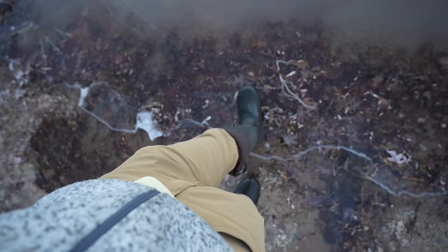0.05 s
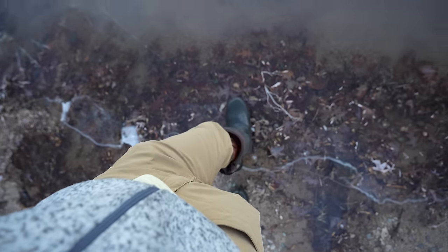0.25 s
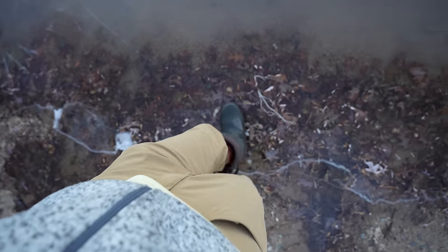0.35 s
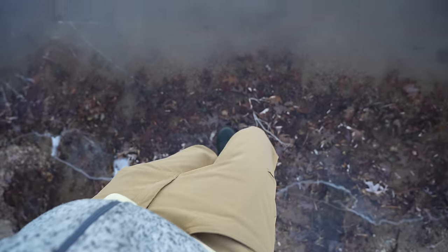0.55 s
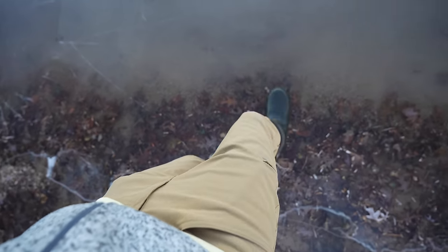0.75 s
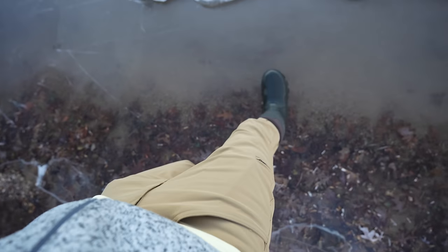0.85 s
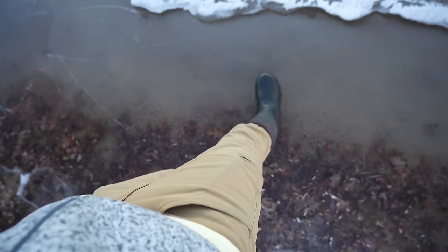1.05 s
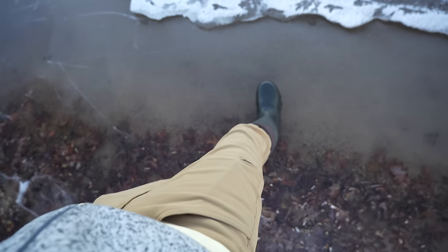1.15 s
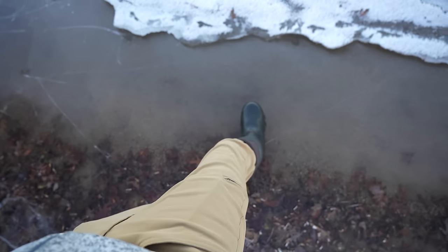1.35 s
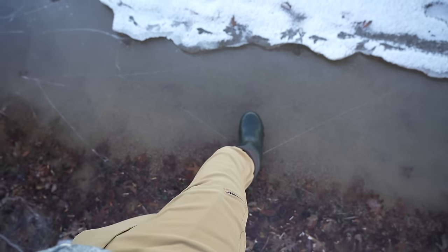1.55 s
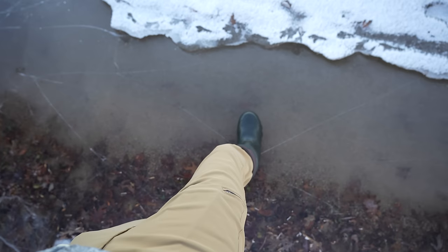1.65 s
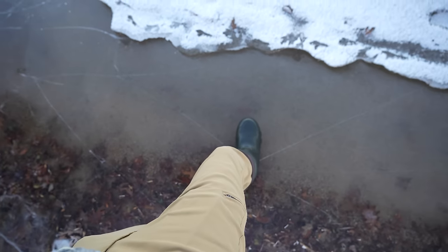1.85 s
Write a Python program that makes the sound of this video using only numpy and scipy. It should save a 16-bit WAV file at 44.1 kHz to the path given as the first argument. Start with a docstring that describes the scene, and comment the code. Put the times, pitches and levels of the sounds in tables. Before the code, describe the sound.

Thin ice crackles under a boot, close by in quiet outdoor air. A short, dull knock comes at about 0.2 seconds, followed by irregular small cracks and a fine, bright fizz with a slightly hollow ring. From 1.2 seconds the cracks crowd together and grow louder over faint low thuds. The sheet breaks with one sharp snap at 1.6 seconds, and lighter crackles fade by 1.9.

```python
"""Thin ice cracks under a rubber boot stepping out from a frozen, leafy shore.
Outdoors, with the microphone at chest height above the ice. Each crack is a spray of splinters,
a short snap and a hollow ring of the sheet, over fine crackle, dull knocks and low thuds.
Under the full weight the cracks crowd together and the sheet breaks once, sharply."""
import sys
import numpy as np
from scipy import signal
from scipy.fft import rfft, irfft, next_fast_len
from scipy.io import wavfile
from scipy.ndimage import map_coordinates

SR = 44100
rng = np.random.default_rng(int(sys.argv[2]) if len(sys.argv) > 2 else 0)


def generate_wav(sig):
    """Save sig (samples, or channels by samples) to the path in sys.argv[1] as 16-bit PCM at SR."""
    pcm = np.round(np.clip(np.atleast_2d(sig).T, -1, 1) * 32767).astype(np.int16)
    wavfile.write(sys.argv[1], SR, pcm)


N = 83790
TIME = np.arange(N) / SR
T = np.arange(4096) / SR  # time within one short sound [s]
FREQS = np.fft.rfftfreq(len(T), 1 / SR) + 1  # [Hz], offset to keep logarithms finite


def amp(db):
    return 10 ** (np.asarray(db) / 20)


def unit(x):
    return x / np.sqrt(np.mean(x ** 2) + 1e-20)


def burst(x, db, window_s=0.005):
    """Give a short sound the energy of level db held for window_s."""
    return amp(db) * x * np.sqrt(window_s * SR / (np.sum(x ** 2) + 1e-20))


def add(out, s, x):
    """Mix x in at time s."""
    i = int(round(s * SR))
    out[i:i + len(x)] += x[:N - i]


def causal(gain):
    """Minimum-phase impulse response of a gain curve."""
    cepstrum = irfft(np.log(np.maximum(gain, 1e-5)))
    cepstrum[1:len(cepstrum) // 2] *= 2
    cepstrum[len(cepstrum) // 2 + 1:] = 0
    return irfft(np.exp(rfft(cepstrum)))


def colour(points):
    """Impulse response of a (frequency [Hz], level [dB]) spectrum."""
    hz, db = np.transpose(points)
    return causal(amp(np.interp(np.log(FREQS), np.log(hz), db)))


def through(x, response):
    return signal.fftconvolve(x, response)[:len(x)]


def radiate(x, low_hz):
    """Little bass reaches the microphone below low_hz."""
    return signal.sosfilt(signal.butter(3, low_hz, "high", fs=SR, output="sos"), x)


# Open air at the shore (frequency [Hz], relative level [dB])
AIR_SPECTRUM = [(25, -38), (60, -5.5), (130, -0.5), (200, 1), (320, -10), (1000, -15), (3000, -27.5),
                (8000, -26.5), (15800, -31)]
def air():
    """A faint, steady rumble of outdoor air at the microphone."""
    return amp(-58) * unit(through(rng.standard_normal(N), colour(AIR_SPECTRUM)))


# Treble and body of the crackle (frequency [Hz], relative level [dB])
FIZZ_SPECTRUM = [(1500, -22.5), (2700, -5.5), (3800, -7.5), (5000, -2.5), (7000, 2), (9500, 2),
                 (12500, -0.5), (15800, -4.5)]
MURMUR_SPECTRUM = [(150, -19), (300, -4), (430, -4.5), (535, 0.5), (680, 0.5), (1000, -1), (2000, -4.5),
                   (3000, -10), (5000, -26)]
# Course of the crackle underfoot (time [s], relative treble level [dB], relative body level [dB])
CRACKLE_LEVELS = [(0, -71, -70), (.11, -73, -71), (.14, -59, -52), (.258, -55, -86), (.28, -46.5, -54),
                  (.34, -42.5, -42.5), (.395, -51.5, -56.5), (.44, -45.5, -47.5), (.52, -45.5, -49.5),
                  (.58, -51.5, -51.5), (.68, -49.5, -48), (.75, -48.5, -48.5), (.79, -47, -51.5),
                  (.815, -44.5, -49), (.88, -47.5, -52.5), (.978, -44, -46.5), (1.1, -40.5, -49.5),
                  (1.234, -46.5, -53.5), (1.275, -27, -35.5), (1.348, -33, -41.5), (1.412, -34, -41),
                  (1.476, -31, -37), (1.54, -32.5, -42), (1.608, -36.5, -46.5), (1.75, -44.5, -49.5),
                  (1.81, -54, -62.5), (1.9, -57, -54.5)]
def crackle(fractures_per_s=900, spread_db=5, even_rustle=0.081):
    """Countless tiny fractures fizz and keep the sheet murmuring."""
    times, treble_db, body_db = np.transpose(CRACKLE_LEVELS)
    fractures = rng.random(N) < fractures_per_s / SR
    sizes = fractures * amp(spread_db * np.minimum(rng.exponential(size=N), 3.5))
    power = np.abs(through(sizes ** 2, np.exp(-T / 0.00049)))
    grains = np.sqrt(power / power.mean() + even_rustle)
    fizz = unit(through(grains * rng.standard_normal(N), colour(FIZZ_SPECTRUM)))
    murmur = unit(through(grains * rng.standard_normal(N), colour(MURMUR_SPECTRUM)))
    fizz *= amp(np.interp(TIME, times, treble_db) - 1)
    murmur *= amp(np.interp(TIME, times, body_db) - 1.5)
    return fizz + murmur


def ruptures(spiky):
    """A dense run of tiny breaks of uneven size."""
    return rng.standard_normal(len(T)) * np.exp(spiky * np.clip(rng.standard_normal(len(T)), -2, 2))


def chips(mean_delay_s=0.0062, die_s=0.00066):
    """Envelope of three loose chips breaking off after a crack."""
    age = T - mean_delay_s * rng.gamma(2, 0.5, size=(3, 1))
    sizes = rng.random(size=(3, 1))
    return np.sum(sizes * (age > 0) * np.exp(-np.abs(age) / die_s), axis=0)


# Splintering ice (frequency [Hz], relative level [dB])
SPLINTER_SPECTRUM = [(1500, -17), (3000, -21.5), (3800, -12), (4800, -4), (7000, 3), (9500, 1.5),
                     (12500, -0.5), (15800, -6.5)]
def splinters(centre_hz, debris, usual_hz=9240, die_s=0.0013):
    """A bright spray of tiny breaks, its treble tilted towards centre_hz."""
    db_per_octave = 23.5 * np.log2(centre_hz / usual_hz)
    tilt_db = db_per_octave * np.log2(np.maximum(FREQS, 4000) / usual_hz)
    gain = np.abs(rfft(colour(SPLINTER_SPECTRUM))) * amp(tilt_db)
    return through(ruptures(spiky=0.61) * (np.exp(-T / die_s) + debris), causal(gain))


def snap(hz, debris, width_octaves=0.69, die_s=0.0019):
    """The short midrange burst of the ice giving way."""
    band = 1 / (1 + (np.log2(FREQS / hz) / width_octaves) ** 2) ** 1.24
    envelope = np.exp(-T / die_s) + amp(-4.5) * debris
    return through(ruptures(spiky=0.61) * envelope, causal(band))


# Upper modes of the sheet (frequency [Hz], relative level [dB], time to fall 60 dB [s])
SHEET_MODES = [(676.6, -4, 0.031), (771, -3.5, 0.02), (912, -2, 0.017), (1124, -1.5, 0.011)]
def flex(glide=0.3, glide_s=0.0034, rise_s=0.00091):
    """High bending waves arrive first, so the sheet rings in a falling chirp, different each time."""
    swept = T + glide * glide_s * (1 - np.exp(-T / glide_s))
    ring = np.zeros(len(T))
    for hz, db, t60 in SHEET_MODES:
        envelope = amp(db + rng.normal(0, 3.5) - 60 * T / t60)
        pitch = hz * (1 + rng.normal(0, 0.039))
        ring += envelope * np.sin(2 * np.pi * (pitch * swept + rng.random()))
    return ring * (1 - np.exp(-T / rise_s))


# Cracks underfoot (time [s], splinter level [dB], nominal splinter centre [Hz], snap level [dB],
# snap pitch [Hz], flex level [dB], hollow note level [dB])
ICE_CRACKS = [(0.143, -40, 12100.0, -38.5, 1530.0, -45.5, -45),
              (0.1525, -52.0, 9700.0, -42, 1540.0, -43.5, -63), (0.19, -41, 9900, -44.5, 1990.0, -54, -54),
              (0.2754, -34, 11300.0, -46.0, 1830.0, -50, -60.0), (0.2821, -31, 9900, -40, 2030.0, -45, -55),
              (0.292, -30.5, 11200, -43.0, 1600.0, -43, -57), (0.299, -37, 9900.0, -49.0, 1680.0, -48, -59),
              (0.3091, -36, 9600, -38, 1410, -40, -50), (0.3225, -35, 8400.0, -34.0, 1450.0, -39, -49),
              (0.3286, -33.5, 8800.0, -45.0, 2110.0, -48, -51), (0.337, -29.0, 9800, -35.5, 1520, -44, -38),
              (0.3704, -34.5, 10500.0, -47.0, 1730.0, -44.5, -50.0),
              (0.4154, -33.5, 11300.0, -49, 1530.0, -44, -56),
              (0.422, -34.0, 11400.0, -44, 1540.0, -42, -43),
              (0.4331, -30.0, 10600.0, -28.5, 1300.0, -35.5, -35),
              (0.4424, -32.5, 10800.0, -43.0, 1900.0, -46.0, -41.0),
              (0.479, -29.5, 8600, -34.0, 1700.0, -40, -44), (0.496, -27.5, 10000, -27, 1530, -28.5, -33),
              (0.5363, -39.5, 10200, -60, 2290.0, -56, -58),
              (0.6143, -36.5, 10900.0, -51.0, 1630.0, -47, -49),
              (0.6359, -34, 8600, -60, 1610.0, -40.5, -57), (0.641, -30.5, 10300.0, -28, 1240, -34, -51),
              (0.6627, -37.5, 11200.0, -50, 1370.0, -47, -46),
              (0.701, -37, 10900.0, -47.0, 1500.0, -39.5, -44),
              (0.7257, -35.0, 8900, -31.0, 1670, -34.5, -35.5),
              (0.7391, -28.0, 8900, -36, 1270, -32.5, -40.0),
              (0.7701, -37.5, 9600.0, -43.0, 2240.0, -55, -47.5),
              (0.8989, -31.5, 11500, -57, 2170.0, -44.0, -50), (0.9106, -32, 7760, -33.0, 1880, -36, -39),
              (0.9159, -36, 8800.0, -31.5, 1610, -35, -41), (0.9276, -34, 8300.0, -33.0, 1760, -39, -39),
              (0.9415, -33, 10700.0, -56, 2150.0, -51, -37), (0.972, -38, 8600.0, -45, 1720, -40.5, -40),
              (1.001, -36, 9600.0, -46, 1990.0, -52, -49), (1.0145, -30.0, 8500, -36.5, 1860.0, -38, -36),
              (1.0318, -43, 9900.0, -45, 1630.0, -35, -49), (1.0516, -31, 8200, -39.5, 1600, -37.5, -39.5),
              (1.0923, -28.5, 9100, -33, 1420, -36, -39), (1.113, -39.0, 9300.0, -37.5, 1660, -39.5, -42.5),
              (1.1302, -37.0, 8100.0, -35.5, 2080, -55, -52), (1.1743, -25, 7250, -25.5, 2130, -61, -47),
              (1.1775, -35, 7900, -39, 2230, -37, -47), (1.184, -22.5, 8300, -32, 1830.0, -34.5, -27.5),
              (1.218, -32.0, 7300, -47.0, 1870.0, -45, -55), (1.2494, -32.0, 8100, -36.5, 2630, -45, -50),
              (1.259, -26, 7850, -21.5, 1630, -35, -28), (1.2654, -25.5, 8800, -32.5, 1910, -30.5, -22),
              (1.2907, -17, 8250, -24.5, 1700.0, -46, -28.5),
              (1.3012, -21.5, 8500.0, -24.5, 1490, -32.5, -28.5),
              (1.3228, -22.5, 9200, -26, 2540, -52, -48), (1.3266, -22, 8800.0, -28, 2090, -39, -34),
              (1.3343, -38.0, 8900.0, -29.0, 2060, -47, -44),
              (1.3457, -26.0, 8800.0, -33, 2410.0, -46, -43),
              (1.3561, -31, 9100.0, -34, 1790.0, -44, -32.5),
              (1.3645, -26.0, 9500, -26.5, 1930, -33.5, -42),
              (1.3685, -30.0, 9300.0, -31, 2240.0, -43, -41),
              (1.391, -29.5, 8300.0, -28.5, 2300.0, -37.5, -38),
              (1.398, -29.0, 8560, -42, 1710.0, -37, -33.5), (1.4322, -36, 9000.0, -32, 2550.0, -35.0, -41),
              (1.4504, -20.5, 8700, -22.0, 1920, -34, -28.5),
              (1.4574, -20.5, 9300.0, -35.0, 1840.0, -44.0, -30),
              (1.4642, -22.5, 8500.0, -31.5, 2030.0, -30, -32.5),
              (1.4746, -22.5, 10400, -37, 1860.0, -47.0, -39),
              (1.484, -29.0, 9700.0, -44, 2230.0, -53, -53), (1.4998, -21.5, 10200, -42, 2160.0, -50, -35),
              (1.509, -22.0, 9400.0, -31.5, 2100, -33.5, -33.0),
              (1.5224, -20.0, 9700, -38.5, 2090.0, -47, -38), (1.5304, -23.5, 9900, -40, 2200, -42, -34),
              (1.5502, -24.0, 8900.0, -48, 2430.0, -46, -37.0), (1.566, -32, 9000.0, -42, 1840.0, -44, -53),
              (1.5792, -24.5, 8400, -34.5, 2000, -40.0, -51), (1.637, -34.5, 7040, -35, 2140, -39.0, -41),
              (1.67, -34.5, 8900, -49.0, 2110.0, -47, -52), (1.6863, -34, 10000.0, -48, 2210.0, -52.0, -48),
              (1.701, -42.0, 8400.0, -42.5, 3020, -58, -56), (1.7297, -35, 7400.0, -37.5, 3160, -48, -53.0),
              (1.7407, -30.0, 10000.0, -38.5, 2360, -45, -59), (1.7636, -36, 8950, -43.5, 1410, -45, -41),
              (1.8291, -32.5, 9100, -31.5, 2430, -40.5, -46),
              (1.8556, -48.0, 8900.0, -38.0, 3000, -55, -50.5),
              (1.8736, -30.5, 9600, -40, 1600.0, -40, -43.5)]
def cracks():
    """Each crack splinters, snaps and flexes the sheet, trailing spray and loose chips."""
    out = np.zeros(N)
    spray = amp(-16.5) * np.exp(-T / 0.0036)
    for s, splinter_db, splinter_hz, snap_db, snap_hz, flex_db, _ in ICE_CRACKS:
        debris = spray + amp(-9) * chips()
        add(out, s, burst(splinters(splinter_hz, debris), splinter_db))
        add(out, s, burst(snap(snap_hz, debris), snap_db))
        add(out, s, burst(flex(), flex_db))
    return out


def hollow_note(hz=533, waver_hz=25, wavers_per_s=110, rise_s=0.0028, t60_s=0.04):
    """Every crack feeds the sheet's wavering lowest mode; the crackle keeps it humming in between."""
    times, _, body_db = np.transpose(CRACKLE_LEVELS)
    power = amp(np.interp(TIME, times, body_db) - 10.5) ** 2
    swing = (1 - np.exp(-T / rise_s)) * amp(-60 * T / t60_s)
    for s, *_, note_db in ICE_CRACKS:
        add(power, s, burst(swing, note_db) ** 2)
    waver = map_coordinates(rng.standard_normal(1024), [TIME * wavers_per_s])
    return np.sqrt(2 * power) * np.sin(2 * np.pi * np.cumsum(hz + waver_hz * waver) / SR)


# Boot knocks and brief rings of the sheet (time [s], level [dB], pitch [Hz], edge hardness [ratio])
KNOCKS_AND_RINGS = [(.183, -47, 1500, 1.6), (0.1914, -47, 1410, 1.7), (.206, -23.5, 840, 2.4),
                    (.2088, -25, 800, 1), (0.2114, -21.5, 810, 2.2), (.264, -40, 1080, 3.2),
                    (.4058, -31.5, 530, 0.92), (.501, -38.5, 480, .3), (.954, -34, 556, 0.35),
                    (1.02, -38.5, 690, .3), (1.262, -36, 417, 0.55)]
def knocks_and_rings(top_hz=2800, die_cycles=0.83):
    """Short, dull knocks from the boot and brief hollow rings of the ice sheet."""
    out = np.zeros(N)
    lowpass = signal.butter(6, top_hz, fs=SR, output="sos")
    for s, db, hz, hardness in KNOCKS_AND_RINGS:
        cycles = hz * T
        tone = np.sin(2 * np.pi * cycles) * np.exp(-cycles / die_cycles)
        edge = hardness * np.sin(2 * np.pi * 2.03 * cycles) * np.exp(-cycles / 0.34)
        grit = 0.05 * ruptures(spiky=0.64) * np.exp(-T / 0.0068)
        body = radiate(signal.sosfilt(lowpass, tone + edge), low_hz=0.76 * hz)
        add(out, s, burst(body + grit, db))
    return out


# Weight coming onto the ice (time [s], level [dB], pitch [Hz])
WEIGHT_THUDS = [(.211, -49, 133), (.407, -49, 159), (1.265, -44, 128), (1.265, -43, 227), (1.284, -49, 150),
                (1.387, -41, 70.5), (1.607, -41.5, 257), (1.615, -43.5, 120), (1.83, -48, 214)]
def thuds(swell_cycles=0.49):
    """Soft, low thuds as the sheet takes the weight."""
    out = np.zeros(N)
    for s, db, hz in WEIGHT_THUDS:
        age = hz * T / swell_cycles
        add(out, s, burst(np.sin(2 * np.pi * hz * T) * age * np.exp(-age), db))
    return out


# Tearing ice (frequency [Hz], relative level [dB])
TEAR_SPECTRUM = [(600, -0.5), (2000, -3), (3700, -17.5), (5000, -1), (7400, -2.5), (10300, -1),
                 (12500, -17), (15800, -8)]
# Modes of the breaking sheet (frequency [Hz], gain [dB], delay [s], rise [s], time to fall 60 dB [s])
SWING_MODES = [(539, -5, 0.00221, .0005, 0.023), (994, -6, 0.00051, 0.0012, 0.021),
               (820, -9.5, 0.0011, 0.00043, .017), (2030, -11.5, 0.00018, 0.00022, 0.015),
               (358, -23, 0.0015, 0.0011, 0.027)]
def big_break(at_s=1.5946, tear_s=0.0014):
    """A tear runs through the sheet, which then swings heavily."""
    out = np.zeros(N)
    after_tear = np.maximum(T - tear_s, 0)
    envelope = np.exp(-after_tear / 0.0014) + amp(-5) * np.exp(-after_tear / 0.0042)
    tear = through(ruptures(spiky=0.12) * envelope, colour(TEAR_SPECTRUM))
    add(out, at_s, burst(tear, db=-11))
    for hz, db, delay, rise, t60 in SWING_MODES:
        age = np.maximum(T - delay, 0)
        swing = amp(db - 60 * age / t60) * (1 - np.exp(-age / rise))
        add(out, at_s, swing * np.sin(2 * np.pi * hz * age))
    return radiate(out, low_hz=348)


def shore(x, db=-20.5, t60_s=0.098):
    """Weak, short scatter reaches the microphone from the ground and the walker's body."""
    spectrum = [(200, 9), (1200, -5.5), (3000, 0), (6000, -5), (15000, -11.5)]
    tail = through(rng.standard_normal(len(T)), colour(spectrum))
    tail *= amp(-60 * T / t60_s) * (1 - np.exp(-T / 0.00049))
    return amp(db) * through(x, tail / np.linalg.norm(tail))


def scene():
    """Ice, boot, nearby scatter and open air at one chest-high microphone."""
    ice = crackle() + cracks() + hollow_note() + knocks_and_rings() + thuds() + big_break()
    return radiate(ice + shore(ice) + air(), low_hz=35)[None]


def record(dry, top_hz=16100):
    """The recorder keeps nothing above its band limit."""
    size = next_fast_len(N + SR // 2)
    passband = np.fft.rfftfreq(size, 1 / SR) < top_hz
    return irfft(rfft(dry, size) * passband, size)[..., :N]


dry = scene()
out = record(dry)
generate_wav(out)
```